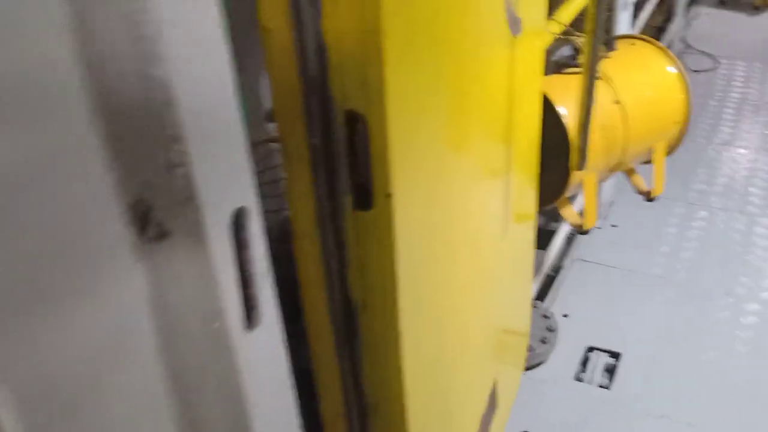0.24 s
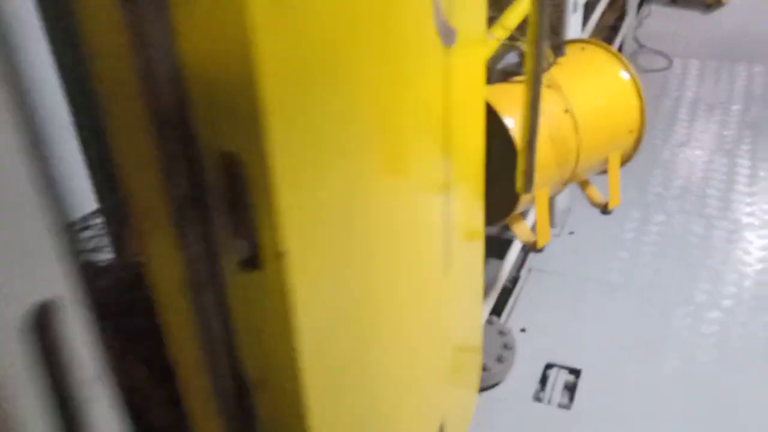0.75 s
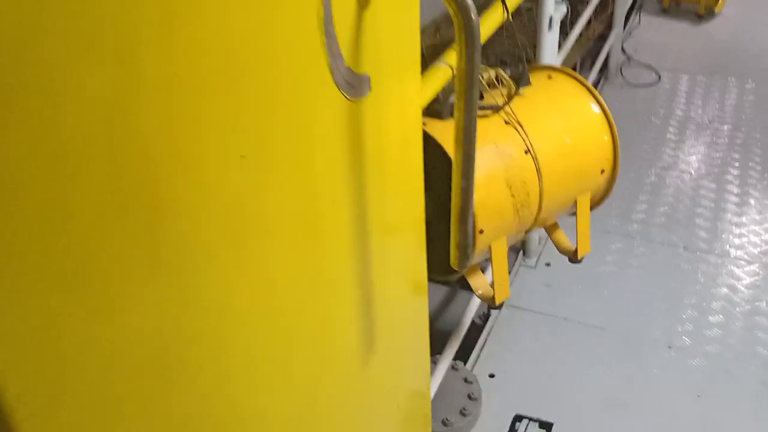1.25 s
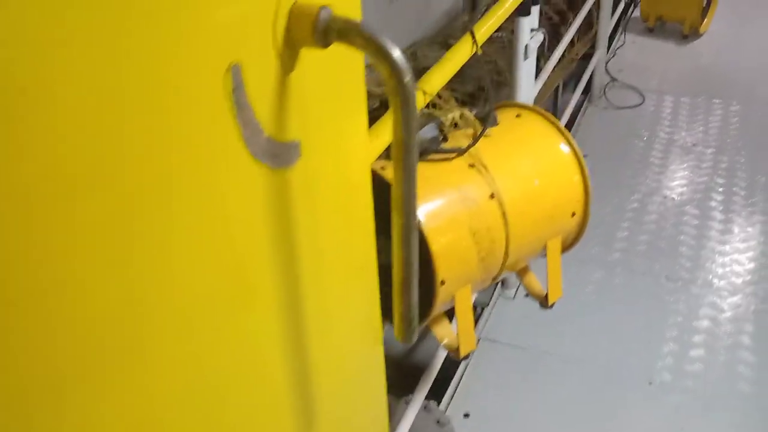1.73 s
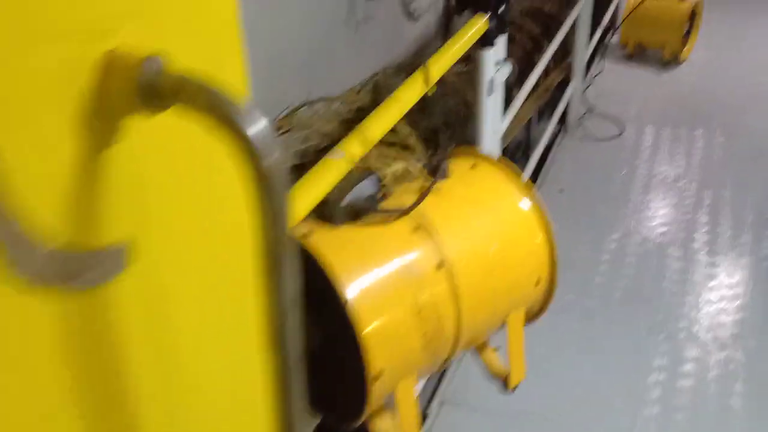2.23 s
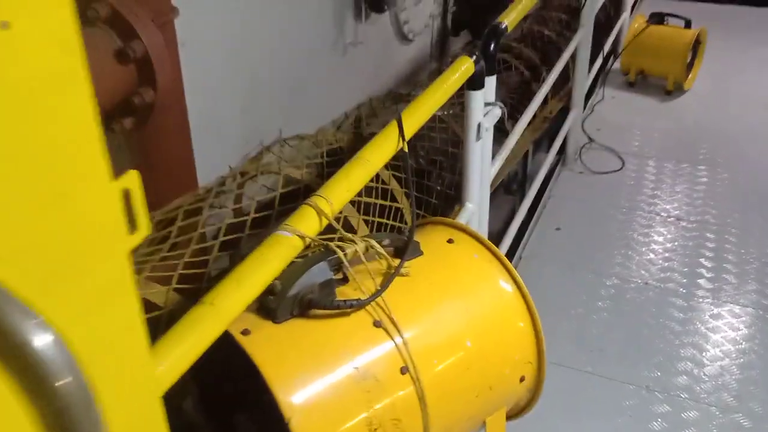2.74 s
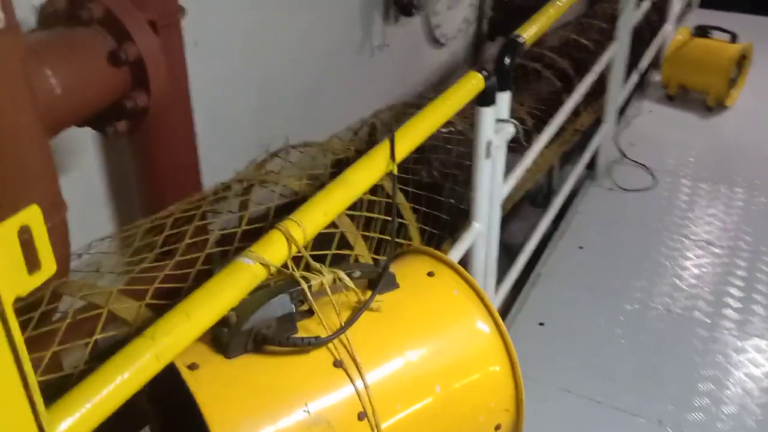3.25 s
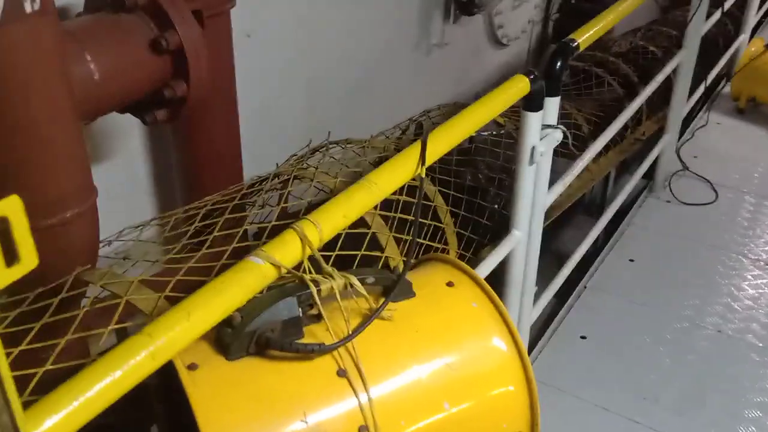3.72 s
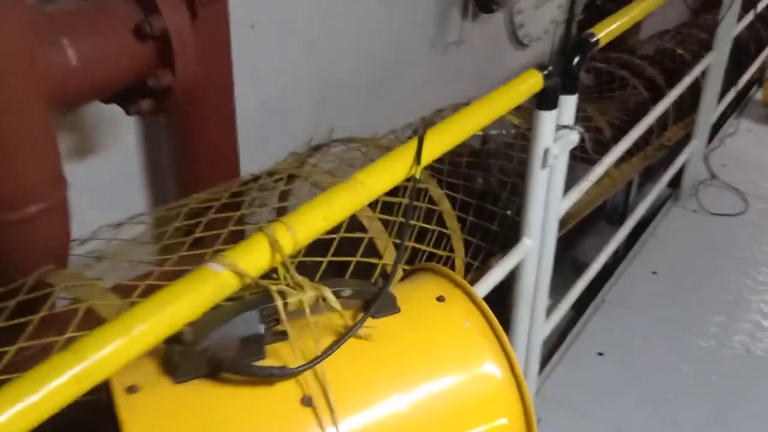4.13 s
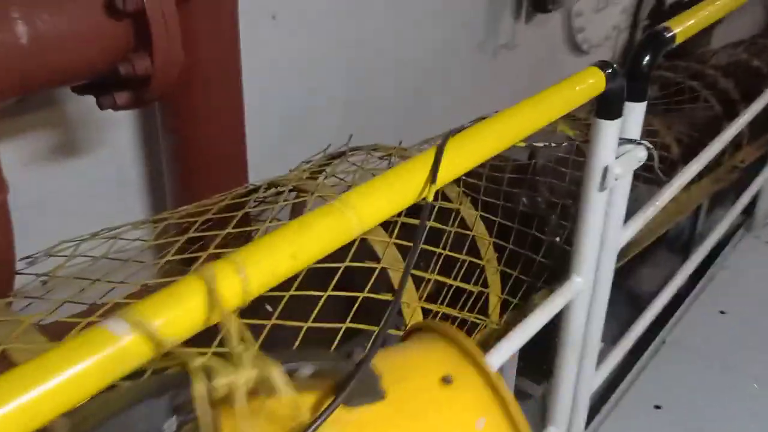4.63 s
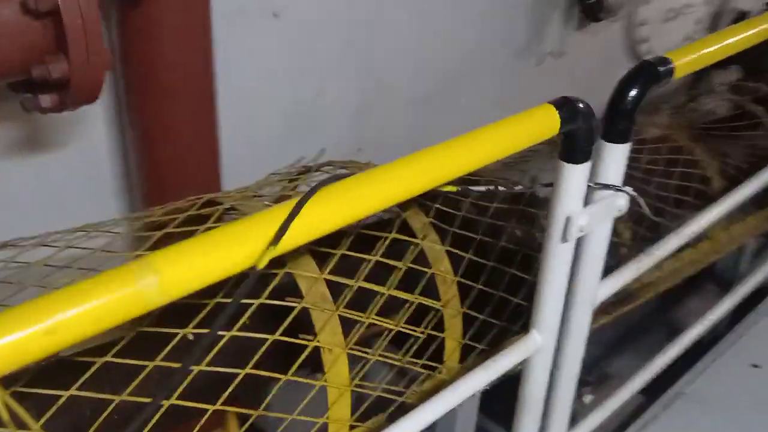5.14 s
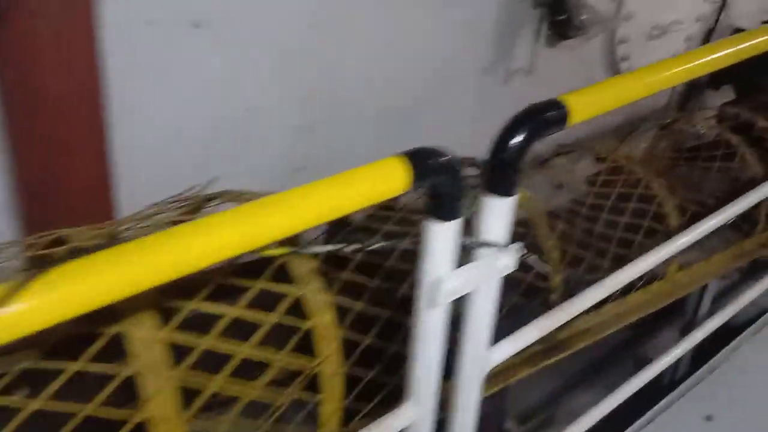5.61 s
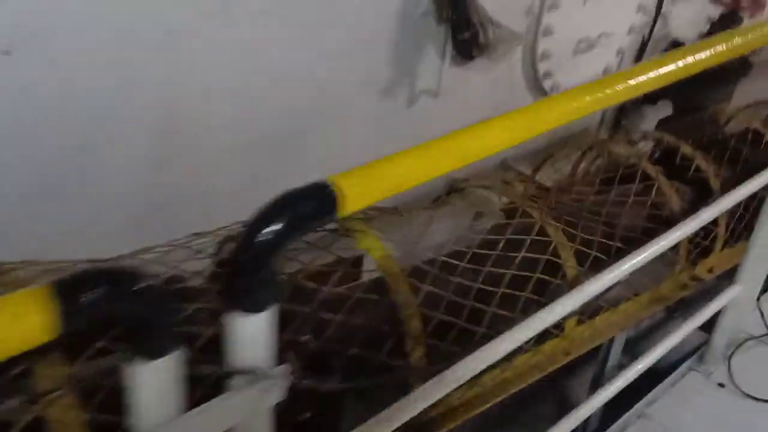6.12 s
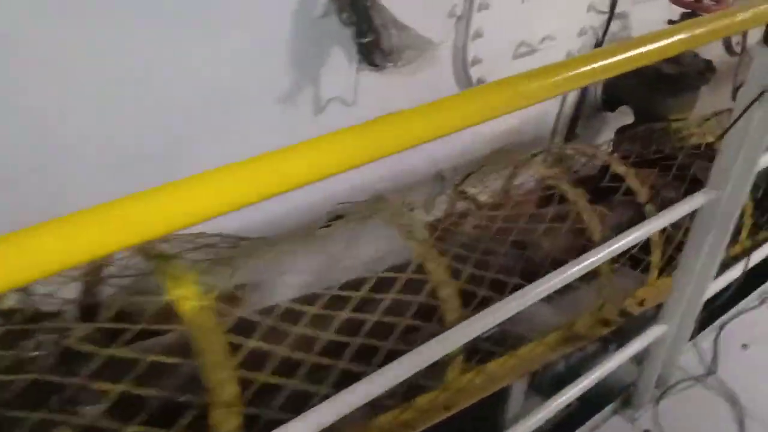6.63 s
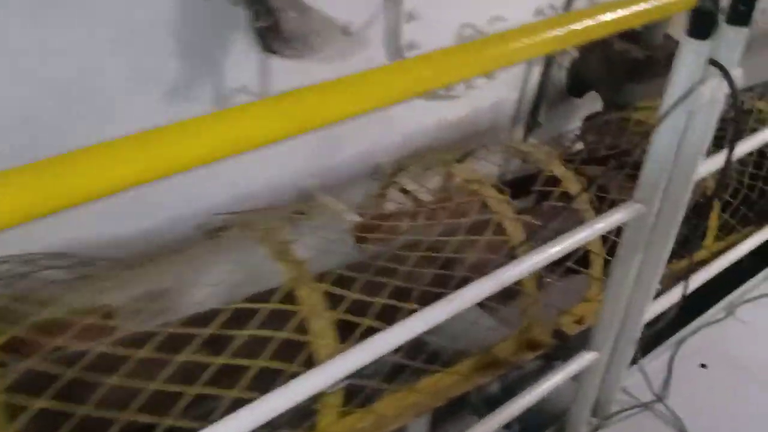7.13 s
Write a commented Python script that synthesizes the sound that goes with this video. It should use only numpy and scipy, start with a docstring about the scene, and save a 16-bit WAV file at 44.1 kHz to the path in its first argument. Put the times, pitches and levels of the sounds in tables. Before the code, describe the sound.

From 0 s, a loud engine room is already running: a deep, steady fan hum near 200 Hz and a thick stack of engine tones, slowly swelling and sinking as the listener walks in from the door. Over the first 2 s, low rumble and broad air roar rise by a few decibels, then hold nearly level. A clear gear tone around 2 kHz beats about four or five times a second, mostly on the right. Above it, a fuzzy, narrow turbocharger whine near 4 kHz wavers irregularly, lifting around 2.7 s, dipping near 3.8 s, and stronger again from 4.6 s. From about 5 s to the end near 7.4 s, the noise is closest and fullest. Lows are centred, the upper roar is wide and leans right, and faint microphone hiss remains on top. The drone never stops.

```python
"""A walk from the door into a steel engine room, heard through two carried microphones for about 7 s.
From the start fan and engine hum as combs of steady shaft orders, the strong ones swelling slowly, with a
beating gear tone mostly on the right. Rumble and air roar rise over the first seconds, with faint
microphone hiss on top. A fuzzy turbocharger whine, made of two narrow noise humps, wavers irregularly
and is stronger later. The noise is at its nearest towards the end."""
import sys
import numpy as np
from scipy import signal
from scipy.fft import rfft, irfft, next_fast_len
from scipy.io import wavfile
from scipy.ndimage import uniform_filter1d, map_coordinates

SR = 44100
rng = np.random.default_rng(int(sys.argv[2]) if len(sys.argv) > 2 else 0)


def inscribe(sig):
    """Save sig as 16-bit PCM at rate SR to the path in sys.argv[1].

    A 1-D sig is mono; a 2-D sig holds one channel per row.
    Samples are clipped to [-1, 1] before scaling.
    """
    pcm = np.round(np.clip(np.atleast_2d(sig).T, -1, 1) * 32767)
    wavfile.write(sys.argv[1], SR, pcm.astype(np.int16))


N = 325017  # length in samples

FAN_HZ, ENGINE_HZ = 24.535, 12.51  # turns of each shaft a second
GEAR_HZ, BEAT_HZ = 2004.5, 4.5  # gear tone, and how far below it the weaker neighbour lies
WHINE_DB = -37.3  # whine level before flutter, waver and nearness
FLUTTER_DB, FLUTTER_HZ = .6, 2.1  # depth of the whine's random flutter, and its random points a second
RUMBLE_FOLLOWS, AIR_FOLLOWS, WHINE_FOLLOWS = .9, .95, .7  # dB gained per dB of nearness
SKIRT = 2.6  # steepness of the sides of the whine humps
CROSSOVER_HZ = 1300  # rumble hands over to the upper noise here
COMB_FROM_HZ = 300  # the roar gathers on shaft orders only above this
BLUR = .001  # growth of a gathered order's width with its frequency
SOUND_SPEED = 343  # m/s
TOP_HZ = 15100  # upper limit of the microphones
STEP = 256  # samples between points of a slow curve

# Fan orders with slow swells. Each entry: multiple of the shaft rate; 8 is the blade passing.
FAN_STRONG_ORDERS = [8, 12, 23, 25, 26, 34, 4, 21, 24, 6]
# Engine orders with slow swells. Each entry: multiple of the shaft rate; 71 stands for a strong tone near
# 888 Hz, perhaps from another machine, placed on the nearest engine order.
ENGINE_STRONG_ORDERS = [9, 14, 26, 71, 6, 11, 13, 18, 12, 17, 15, 25]

# Slow swells of each strong tone, in the same sequence. Each row: steady level in dB, then for every
# swell its strength in dB against the steady part, drift rate in m/s, peak moment in seconds.
FAN_SWELLS = [(-23.8, -7.4, -0.108, 0.68, -4.8, 0.25, 4.26, -6.3, 0.376, 1.37, -11.7, -0.48, 3.38, -23.0, -0.86, 3.42),
              (-36.6, -17.2, 1.058, 4.07, -2.1, -0.187, 1.57, -7.4, 0.482, 3.87, -12.4, 0.331, 6.26, -12.6, 0.639, 4.41, -18.4, 1.484, 4.18, -14.9, 1.151, 4.35),
              (-37.1, -2.7, 0.299, 4.26, -6.5, 0.083, 2.87, -7.8, -0.207, 4.25, -0.7, 0.041, 11.0, -9.9, -0.474, 3.82, -18.1, -0.71, 4.59, -9.8, 0.507, 3.56),
              (-38.3, -1.0, -0.087, 2.44, -1.1, 0.24, 3.09, -2.7, 0.359, 4.27, -6.3, -0.286, 3.64, -0.0, 0.202, 4.55, -10.7, -0.782, 3.47, -11.7, 1.033, 3.54),
              (-41.8, -1.7, -0.121, 3.47, -0.8, -0.179, 4.4, -12.5, 0.451, 3.47, -7.6, 0.302, 4.64, -7.5, 0.33, 3.64, -9.2, -0.735, 3.4, -15.0, 1.033, 4.01),
              (-40.2, -2.2, -0.15, 4.39, -6.8, -0.506, 3.66, -0.0, -0.058, 5.14, -3.8, 0.285, 4.3, -3.4, 0.156, 2.8, -7.1, 0.673, 3.69, -9.2, 0.705, 3.31),
              (-44.6, -7.0, -0.653, 4.3, -6.4, 0.645, 3.62, -0.0, 0.236, 10.56, -8.4, -2.0, 3.31, -10.0, 2.0, 2.89),
              (-47.2, -2.5, 0.314, 5.42, -2.8, -0.248, 2.31, -3.1, 0.197, 1.84, -5.6, -0.031, -0.72, -5.3, -0.778, 3.37, -9.8, 1.294, 3.24, -9.0, -1.091, 4.18),
              (-48.6, -3.1, -0.628, 4.27, -0.1, 0.395, 3.04, -0.0, -0.273, 3.06, -0.4, 0.363, 4.0, -0.2, -0.227, 1.99, -6.1, -0.538, 4.11, -15.5, 1.18, 3.25),
              (-46.4, -4.7, -0.894, 3.63, -5.7, -0.262, 5.51, -20.5, -1.387, 3.34, -16.8, 1.163, 3.05, -25.0, -1.818, 3.68)]
ENGINE_SWELLS = [(-48.4, -0.0, -0.466, 2.17, -2.8, -0.989, 5.12, -2.4, -1.368, 4.03, -0.5, 1.288, 2.76, -6.9, -2.0, 3.61),
                 (-37.7, -0.1, -0.316, 3.45, -2.5, 0.588, 5.03, -9.2, 0.831, 4.38, -11.9, -0.657, 4.06, -21.0, 1.313, 3.63),
                 (-44.8, -4.6, -0.581, 3.76, -7.9, -0.317, 1.88, -9.6, -0.536, 3.2, -9.4, -0.137, 4.96, -3.1, 0.221, 2.83, -11.6, 0.687, 3.48, -13.6, -1.449, 3.43),
                 (-39.8, -2.9, -0.296, 4.04, -5.1, -0.219, 4.31, -14.3, 0.238, 4.81, -13.6, 0.13, 4.43, -0.3, -0.023, 9.59, -8.8, -0.636, 3.42, -13.4, 0.662, 4.47),
                 (-52.3, -1.0, 0.518, 7.65, -2.8, 0.888, 2.78, -8.1, 1.212, 4.96, -10.5, -1.023, 1.76, -16.4, 1.763, 3.42),
                 (-45.8, -2.6, -0.651, 4.95, -6.8, 0.683, 5.21, -10.6, -0.237, -0.09, -12.6, -1.103, 3.15, -16.2, 1.574, 3.09),
                 (-47.5, -0.6, -0.42, 3.68, -9.2, -2.0, 2.63, -5.0, 0.625, 2.94, -16.5, -0.716, 4.1, -16.8, -1.85, 3.23),
                 (-44.4, -0.0, 0.229, 4.13, -2.5, 0.491, 4.9, -4.6, -0.454, 4.14, -6.9, 0.934, 3.47, -13.3, 1.359, 3.22),
                 (-46.1, -2.6, -0.311, 4.64, -8.7, -0.895, 4.02, -13.1, 1.621, 3.93, -12.9, 0.782, 3.09, -15.2, 1.255, 3.21),
                 (-42.2, -1.7, -0.525, 2.23, -11.6, 0.281, 3.04, -6.8, -0.128, 8.61, -20.2, 0.897, 4.05, -14.4, 1.13, 2.78),
                 (-47.3, -1.3, -0.253, 2.92, -2.7, -0.569, 5.07, -4.3, 0.535, 2.98, -9.8, 0.097, 7.09, -9.6, -1.264, 3.12),
                 (-51.1, -0.7, -0.621, 3.69, -0.0, -0.306, 1.76, -3.7, 0.154, 5.12, -8.1, -0.948, 4.14, -7.0, -1.527, 3.7)]
# The same columns for the gear tone, ahead of its final gain.
GEAR_SWELLS = [(-43.0, -11.8, -0.064, 2.51, -2.7, -0.039, 2.99, -0.0, 0.115, 4.27, -3.2, 0.155, 3.9, -4.6, 0.236, 4.15, -8.9, -0.429, 3.99, -9.4, -0.294, 3.49, -8.2, 0.311, 3.68, -2.8, -0.279, 4.37)]

# Other orders, with random fading only. Each row: multiple of the shaft rate, level in dB before fading.
FAN_OTHER_ORDERS = [(2, -62.5), (10, -46), (20, -52), (27, -44.5), (30, -48.5), (33, -45), (47, -52),
                    (50, -51), (60, -52), (64, -45), (65, -51), (66, -53), (67, -53), (68, -48), (69, -46),
                    (70, -50), (77, -51), (88, -54), (90, -50), (142, -61), (180, -62), (189, -61)]
ENGINE_OTHER_ORDERS = [(4, -61), (5, -64), (8, -50), (7, -55), (10, -45), (21, -52), (23, -52), (24, -46.5),
                       (36, -55), (52, -44), (54, -44), (56, -46), (57, -44), (58, -47), (63, -49),
                       (64, -46), (69, -47), (70, -50), (72, -48), (88, -53), (96, -54), (111, -53),
                       (148, -44), (157, -52)]

# Humps of the whine. Each row: centre in Hz, width at half amplitude in Hz, relative level in dB.
WHINE_HUMPS = [(3840, 185, -2), (4060, 300, -7)]
# Irregular waver of the lower hump, stronger later. Each row: time in seconds, relative level in dB.
WHINE_WAVER = [(0, -3.5), (.6, -2.5), (1.3, -1.5), (2, -2), (2.7, 1), (3.3, .4), (3.8, -1.2), (4.6, 1.5),
               (5.3, 0), (6, 1), (6.6, 1.7), (7.4, 1.2)]

# Upper noise before combing and nearness: air roar, with faint microphone hiss above about 6.5 kHz.
# Each row: frequency in Hz, density in dB per Hz.
UPPER_COLOUR = [(1300, -59.5), (1550, -61), (1950, -57.3), (2100, -58), (2300, -58), (2500, -61),
                (3000, -67.5), (3500, -70.5), (4500, -71), (5200, -74.5), (6000, -83.5), (6800, -91.5),
                (7500, -96.5), (8400, -96.5), (9600, -104), (11300, -100), (12600, -105), (13700, -100),
                (15000, -111)]
# Rumble before combing and nearness. Each row: frequency in Hz, density in dB per Hz.
RUMBLE_COLOUR = [(30, -85), (45, -81), (56, -76.5), (70, -74), (100, -64.5), (120, -62), (155, -54),
                 (210, -58), (270, -57.5), (350, -60), (460, -60.5), (560, -56.6), (680, -52.6), (770, -57),
                 (900, -55.8), (1050, -59), (1300, -60.5)]
# Walking in from the door. Each row: time in seconds, nearness to the noise in dB.
NEARNESS = [(0, -3.5), (.4, -2), (1, -1), (2, 0), (3, .4), (4.5, .4), (5, 1.1), (7.4, 1.5)]
# Gathering of the roar on shaft orders. Each row: frequency in Hz, share of the noise power.
FAN_COMB_SHARE = [(300, .2), (900, .1), (1500, .14), (2500, .12), (3300, .08), (4500, 0)]
ENGINE_COMB_SHARE = [(300, .2), (1100, .16), (1500, .05), (2000, .08), (2500, 0)]

# Stereo likeness. Each row: frequency in Hz, left-right correlation before the lead.
STEREO_LIKENESS = [(40, .95), (70, .97), (150, .985), (200, .995), (250, .95), (300, .91), (420, .78),
                   (620, .82), (780, .58), (1030, .33), (1300, .14), (1600, .22), (2100, .13), (3000, .03)]
# Stereo balance. Each row: frequency in Hz, left minus right in dB.
STEREO_TILT = [(200, -.1), (500, -.8), (760, -1.2), (870, -1), (1050, -2.8), (1430, -3.7), (2030, -5.7),
               (2890, -4.7), (4110, -6.5), (5000, -4.3), (6000, 1), (7000, 1.2), (10000, .5)]
# Stereo phase. Each row: frequency in Hz, lead of left over right in radians.
STEREO_LEAD = [(250, 0), (780, .3), (1050, .5), (1550, 2.2), (2100, 2.6), (2800, 5.5)]


def amp(db):
    """Amplitude of a level in dB."""
    return 10 ** (np.asarray(db) / 20)


def along(points, hz):
    """Read a curve of (Hz, value) points on a log frequency axis."""
    f, v = np.transpose(points)
    return np.interp(np.log(hz + 1), np.log(f + 1), v)


def curve(points):
    """Draw (seconds, value) points as one value per sample."""
    s, v = np.transpose(points)
    return np.interp(np.arange(N) / SR, s, v)


def machine(shaft_hz, strong, swells, others):
    """A turning shaft sounds at whole multiples of its rate; random fading deepens with frequency."""
    total = 0
    for order, row in zip(strong, swells):
        hz = order * shaft_hz
        fading = .02 * (hz / 800) ** 2
        total = total + tone(hz, swelling(hz, row), fading=fading, speed=1.224, wide=.9)
    for order, db in others:
        hz = round(order) * shaft_hz
        total = total + tone(hz, amp(db), fading=.3 + hz / 4000, speed=.802, wide=1.0)
    return total


def gear():
    """Two close gear tones beat firmly on the right; the left gets only a fading reflection."""
    level = swelling(GEAR_HZ, GEAR_SWELLS[0])
    main = tone(GEAR_HZ, level, fading=.02, speed=.4, wide=.15)
    neighbour = tone(GEAR_HZ - BEAT_HZ, level * amp(-6), fading=.1, speed=.26, wide=.15)
    reflection = tone(GEAR_HZ, amp(-45), fading=.7, speed=.4, wide=.5)
    right = amp(2.6) * (main + neighbour)[1]
    return np.array([reflection[0], right])


def swelling(hz, row):
    """Slow swells of a tone: turning parts drift in and out of step with its steady part."""
    t = np.arange(0, N + STEP, STEP) / SR
    swells = 0
    for db, drift, peak in np.reshape(row[1:], (-1, 3)):
        turns = hz / SOUND_SPEED * drift * (t - peak)
        swells = swells + amp(db) * np.exp(2j * np.pi * turns)
    level = amp(row[0]) * np.abs(1 + swells)
    return np.interp(np.arange(N) / SR, t, level)


def tone(hz, level, fading, speed, wide):
    """A steady sine with two random echoes that vary per wavelength walked at speed in m/s."""
    t = np.arange(N) / SR
    slow = np.arange(0, N + STEP, STEP) / SR
    place = slow * np.clip(speed * hz / SOUND_SPEED, .2, 20)  # random points passed
    knots = rng.standard_normal((4, 200))
    parts = np.array([map_coordinates(k, [place]) for k in knots])
    echo = (parts[:2] + 1j * parts[2:]) / np.sqrt(2)
    share = np.clip(fading, 0, 1)  # power given to the first echo
    common = np.sqrt(1 - share) + np.sqrt(share) * echo[0]
    # the second echo reaches the two microphones in opposite senses
    pair = spread(hz) @ np.array([common, wide * echo[1]])
    angle = 2 * np.pi * hz * t + rng.uniform(0, 2 * np.pi)
    cos, sin = np.cos(angle), np.sin(angle)
    sides = [np.interp(t, slow, g.real) * cos - np.interp(t, slow, g.imag) * sin for g in pair]
    return np.sqrt(2) * level * np.array(sides)


def whine():
    """Fuzzy turbocharger whine: noise in two narrow humps, one wavering and one following the nearness."""
    place = np.arange(N) / SR * FLUTTER_HZ
    flutter = map_coordinates(rng.standard_normal(40), [place])
    lower, upper = [hump(*row) for row in WHINE_HUMPS]
    near = amp(WHINE_FOLLOWS * curve(NEARNESS))
    body = amp(curve(WHINE_WAVER)) * lower + near * upper
    return amp(WHINE_DB + FLUTTER_DB * flutter) * body / body.std()


def hump(centre_hz, width_hz, db):
    """Narrow noise that thins out on both sides of its centre."""
    def gain(hz):
        return amp(db) / (1 + np.abs(2 * (hz - centre_hz) / width_hz) ** SKIRT)
    return rush(gain, patchy_db=1.5)


def upper_noise():
    """Air roar, partly gathered on shaft orders, with faint microphone hiss above about 6.5 kHz."""
    def gain(hz):
        return amp(along(UPPER_COLOUR, hz)) * combed(hz) * np.sqrt(1 - low_share(hz))
    return amp(AIR_FOLLOWS * curve(NEARNESS)) * rush(gain, patchy_db=1.0)


def rumble():
    """Hull rumble: the lower noise, partly gathered on shaft orders and growing with nearness."""
    def gain(hz):
        return amp(along(RUMBLE_COLOUR, hz)) * combed(hz) * np.sqrt(low_share(hz))
    return amp(RUMBLE_FOLLOWS * curve(NEARNESS)) * rush(gain, patchy_db=1.5)


def low_share(hz):
    """Share of noise power on the rumble side of the crossover."""
    return 1 / (1 + (hz / CROSSOVER_HZ) ** 6)


def combed(hz):
    """Gain that gathers part of the roar in narrow bands on every order of both shafts."""
    power = 1
    for shaft_hz, comb in ((FAN_HZ, FAN_COMB_SHARE), (ENGINE_HZ, ENGINE_COMB_SHARE)):
        width = .5 + BLUR * hz
        off = hz - shaft_hz * np.round(hz / shaft_hz)
        teeth = shaft_hz / (width * np.sqrt(2 * np.pi)) * np.exp(-.5 * (off / width) ** 2)
        power = power + along(comb, hz) * (hz > COMB_FROM_HZ) * (teeth - 1)
    return np.sqrt(power)


def rush(gain, patchy_db):
    """Stereo noise of amplitude gain(hz) per root hertz, in soft random patches of time and frequency."""
    m = next_fast_len(N + 8192)
    hz = np.fft.rfftfreq(m, 1 / SR)
    z = signal.stft(rng.standard_normal((2, m + 1024)), nperseg=1024)[2]
    field = rng.standard_normal(z.shape[1:])
    field = uniform_filter1d(field, size=6, axis=0)  # smooth over frequency
    field = uniform_filter1d(field, size=20, axis=1)  # smooth over time
    patches = amp(patchy_db * field / field.std())
    patches = patches / np.sqrt(np.mean(patches ** 2))
    white = signal.istft(z * patches, nperseg=1024)[1][:, :m]
    pair = rfft(white) * gain(hz) * np.sqrt(SR / 2)
    return irfft((spread(hz) * pair).sum(axis=1), m)[:, :N]


def spread(hz):
    """Weights of two unrelated sounds (columns) in left and right (rows), by likeness, tilt and lead."""
    turn = np.arccos(np.clip(along(STEREO_LIKENESS, hz), -1, 1)) / 2
    lean = amp(along(STEREO_TILT, hz) / 2)
    power = np.sqrt((lean ** 2 + lean ** -2) / 2)
    left = lean * np.exp(.5j * along(STEREO_LEAD, hz))
    both, opposed = np.cos(turn), np.sin(turn)
    return np.array([[both * left, opposed * left], [both / left, -opposed / left]]) / power


def filtered(x, response):
    """Shape the spectrum of x by a response of frequency."""
    m = next_fast_len(N + 8192)
    return irfft(rfft(x, m) * response(np.fft.rfftfreq(m, 1 / SR)), m)[..., :N]


def scene():
    """Sum the machines, the gear tone and the noise layers in the room."""
    fan = machine(FAN_HZ, FAN_STRONG_ORDERS, FAN_SWELLS, FAN_OTHER_ORDERS)
    engine = machine(ENGINE_HZ, ENGINE_STRONG_ORDERS, ENGINE_SWELLS, ENGINE_OTHER_ORDERS)
    return fan + engine + gear() + whine() + upper_noise() + rumble()


def record(dry):
    """The microphones keep nothing above their band limit."""
    return filtered(dry, lambda hz: hz < TOP_HZ)


dry = scene()
out = record(dry)
inscribe(out)
```